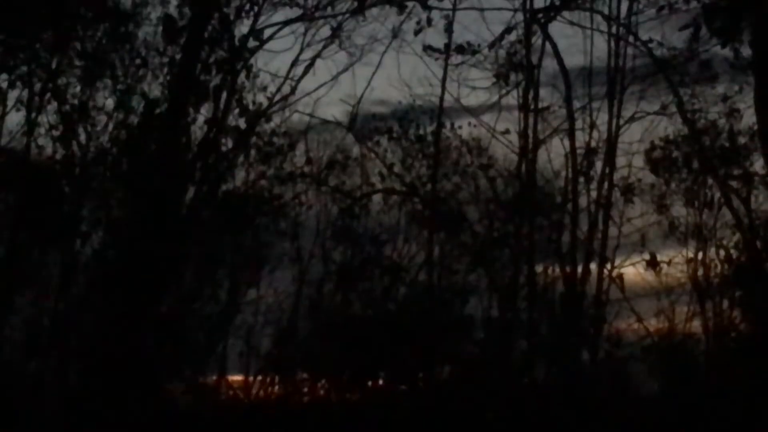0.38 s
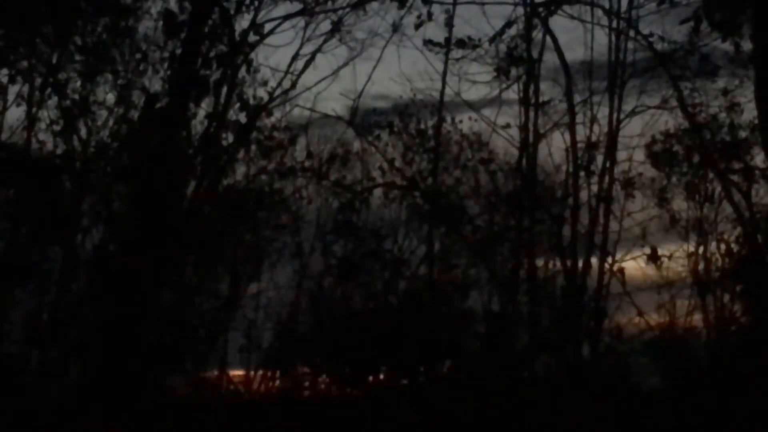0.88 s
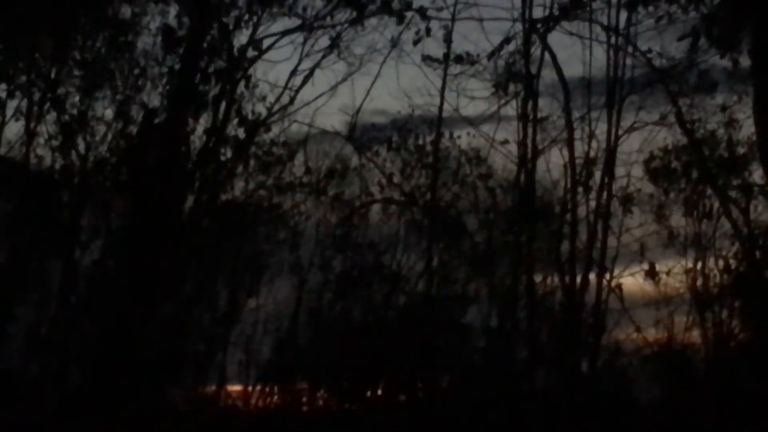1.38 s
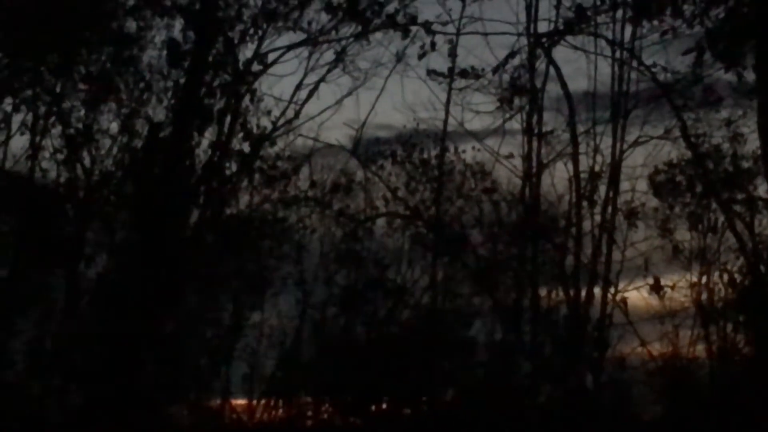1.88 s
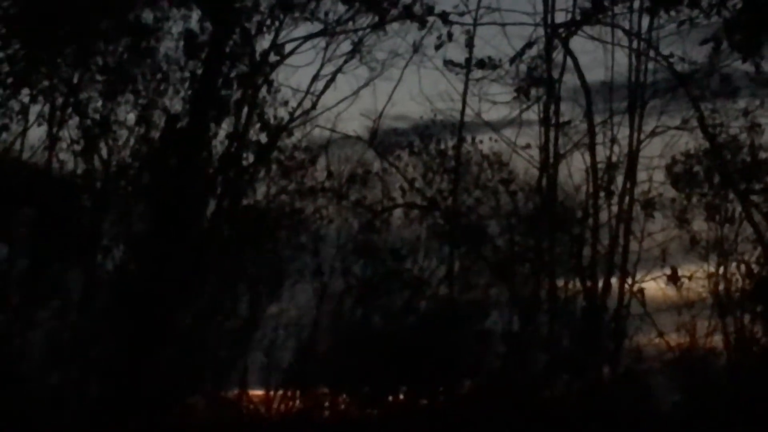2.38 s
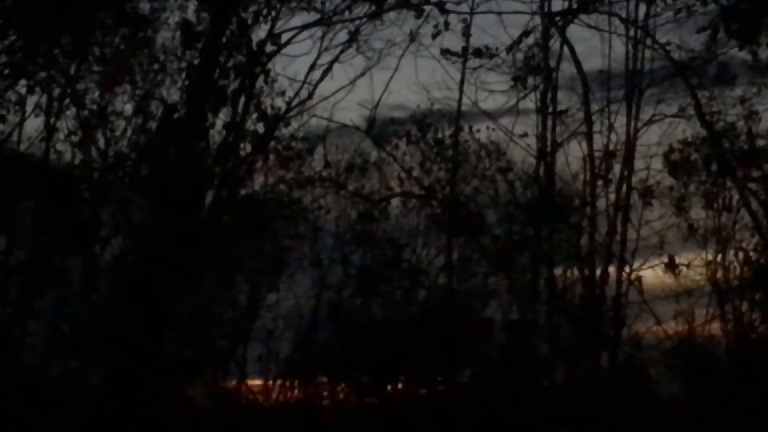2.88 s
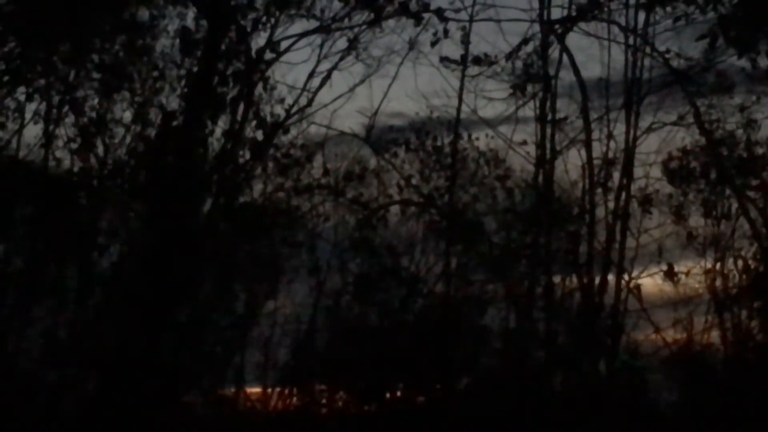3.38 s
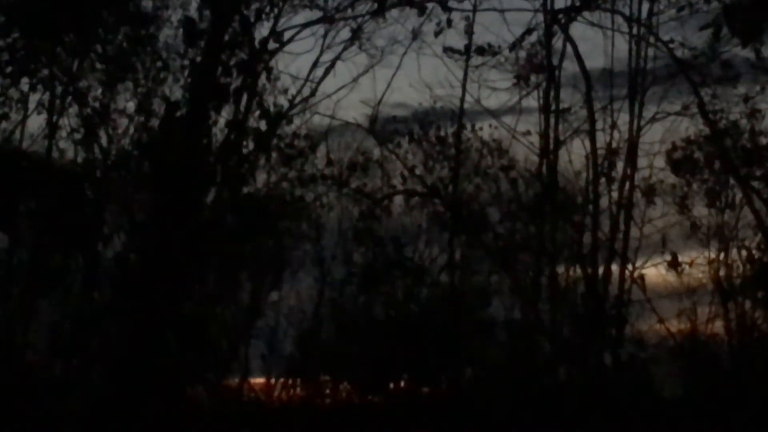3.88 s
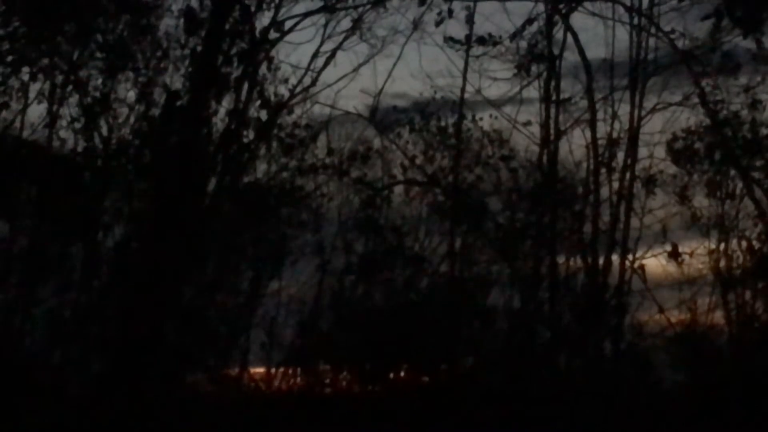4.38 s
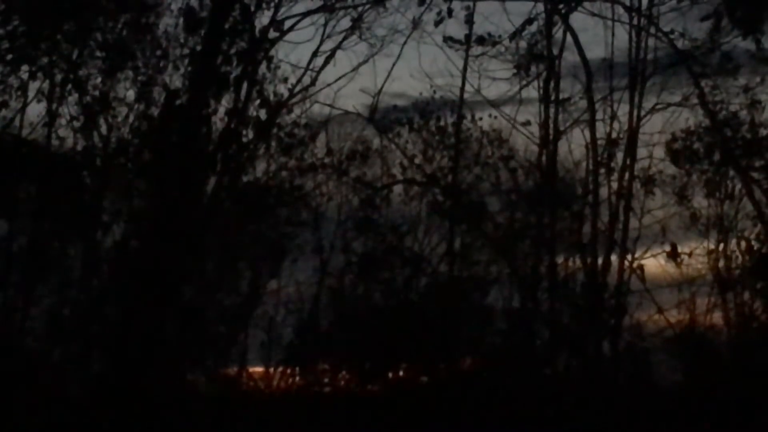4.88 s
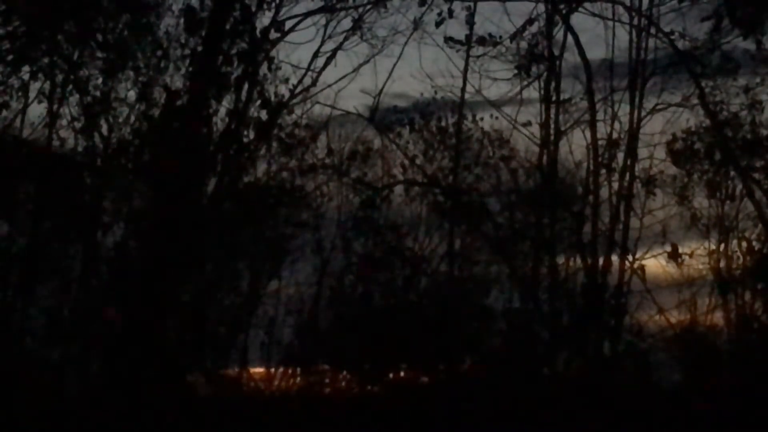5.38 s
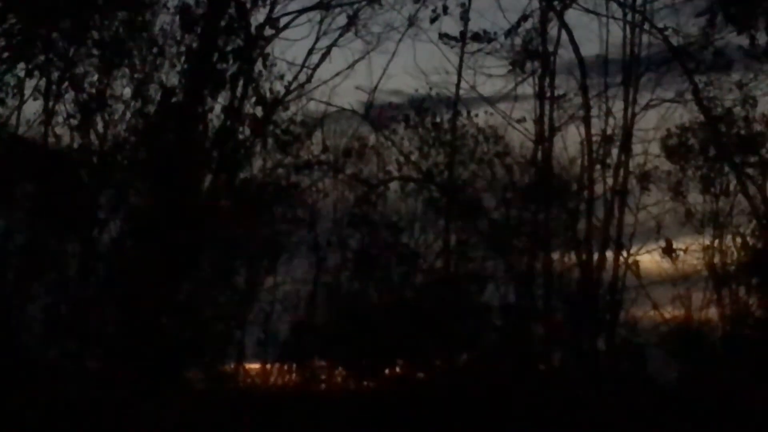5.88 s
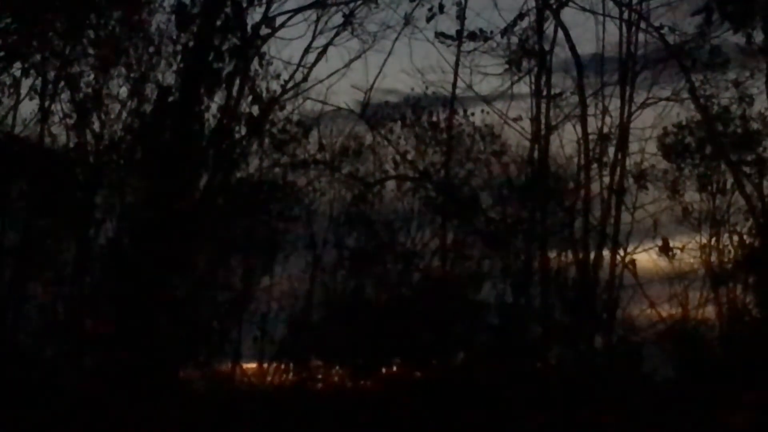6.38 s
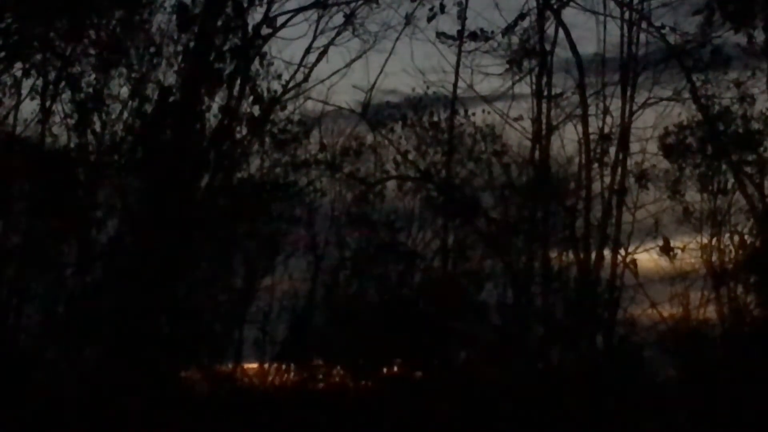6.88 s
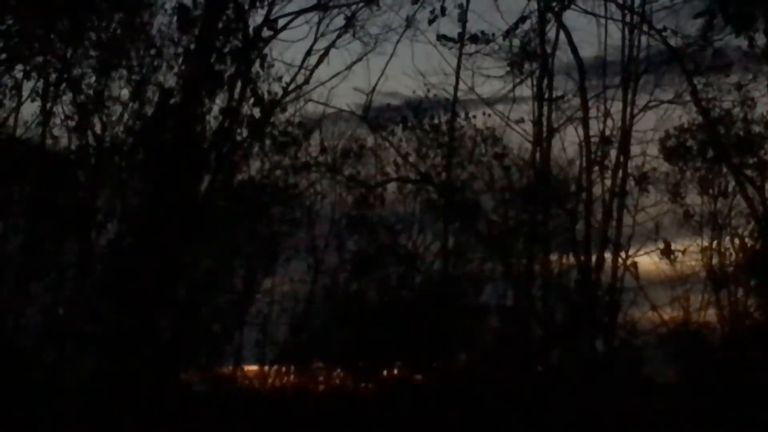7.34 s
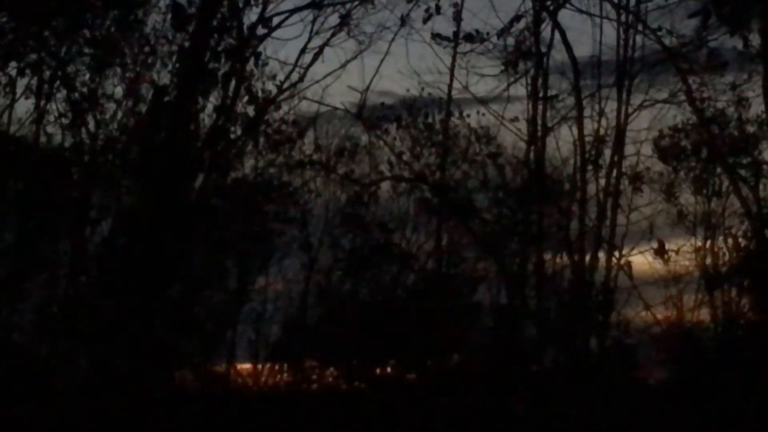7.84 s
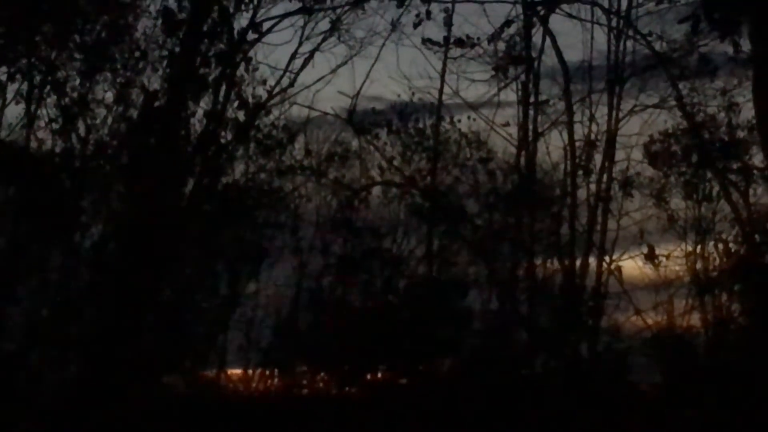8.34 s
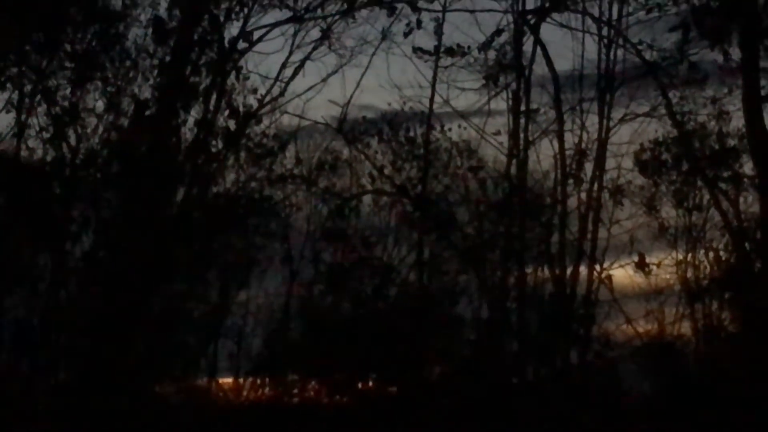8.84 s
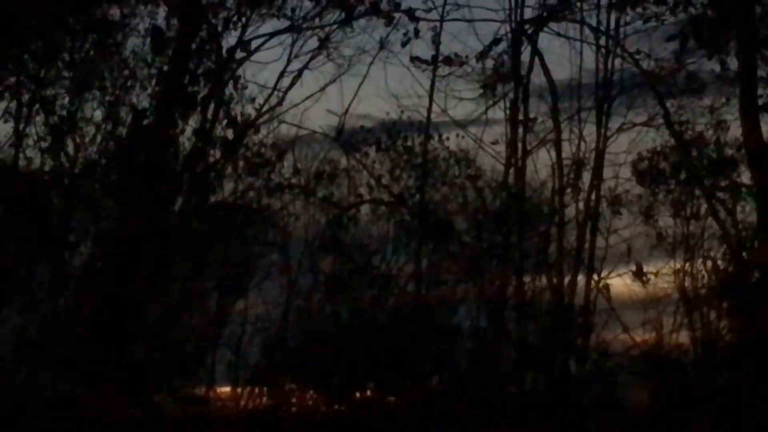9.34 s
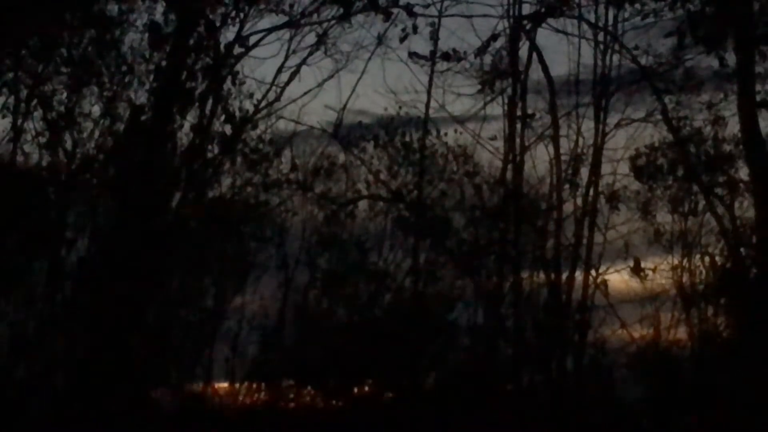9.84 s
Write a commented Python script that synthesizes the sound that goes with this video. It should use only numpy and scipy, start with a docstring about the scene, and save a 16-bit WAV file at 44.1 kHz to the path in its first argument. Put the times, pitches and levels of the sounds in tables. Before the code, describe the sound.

For the first 0.08 seconds there is low indoor rumble and the end of a hollow knock, then a hard cut to a dusk forest. A dense cricket chorus, strongest around 5.4 kHz with a thinner layer near 7 kHz, trills steadily to the end at about 10 seconds. Higher crickets and one nearer cricket chirp repeatedly, roughly twice a second. A small frog peeps about four times a second in broken runs; a higher one answers more often and louder after 6. Short rattling croaks come near 0.7, 1.5, 3.3, 4.0, 7.1, 7.8, 9.1 and 9.9. A far engine revs low throughout, surging around 2-2.6 and 5.7-6, then sinking and blipping near 9. Dry katydid rasps occur at 2.6 and 6.3; barely audible hoots at 2.3, 4.2 and 7.3. Faint slow trills come and go.

```python
"""First heard: an instant of indoor rumble and a hollow knock, then a forest at dusk.
Two cricket choirs, built of many drifting tones, stand in a far wash of insects and air made of shaped noise.
Nearer crickets chirp, frogs peep and croak and far hoots sound, all as gliding or pulsed tones in strokes.
A katydid rasps twice, as clicking noise through its wing resonances.
A distant engine is revved up and down: four orders of its firing rate over exhaust roar."""
import sys
import numpy as np
from scipy import signal
from scipy.fft import rfft, irfft, next_fast_len
from scipy.io import wavfile
from scipy.ndimage import uniform_filter1d, map_coordinates

SR = 44100
rng = np.random.default_rng(int(sys.argv[2]) if len(sys.argv) > 2 else 0)


def volts(x):
    """Linear amplitude factor 10**(x/20) for a level x in dB, scalar or array-like."""
    e = np.asarray(x, float) / 20
    return 10 ** e


def generate_wav(sig):
    """Save sig (samples, or channels by samples) to the path in sys.argv[1] as 16-bit PCM at SR."""
    pcm = np.round(np.clip(np.atleast_2d(sig).T, -1, 1) * 32767).astype(np.int16)
    wavfile.write(sys.argv[1], SR, pcm)


N = 440118
T = np.arange(N) / SR
RUN_SCATTER_S = .004  # how early or late the calls of a steady run fall


def unit(x):
    """Scales a sound to rms 1."""
    return x / np.sqrt(np.mean(x ** 2) + 1e-20)


def wobble(rate):
    """A smooth random curve, rate knots a second."""
    return map_coordinates(rng.standard_normal(int(N * rate / SR) + 4), [T * rate])


def filtered(x, response):
    """Multiplies the spectrum of x by a response of frequency."""
    m = next_fast_len(N + SR // 2)
    return irfft(rfft(x, m) * response(np.fft.rfftfreq(m, 1 / SR)), m)[:N]


def modes(table):
    """The summed response of resonances, given as (f/Hz, width/Hz, level/dB)."""
    return lambda f: sum(volts(db) * 1j * f * w / (c * c - f * f + 1j * f * w) for c, w, db in table)


def rush(spectrum, patchy_db):
    """Coloured noise of rms 1 with patches of random gain over time and frequency."""
    z = signal.stft(rng.standard_normal(N + 512), nperseg=512)[2]
    field = uniform_filter1d(rng.standard_normal(z.shape), 4, 0)
    field = uniform_filter1d(field, 10, 1)
    x = signal.istft(z * volts(patchy_db * unit(field)), nperseg=512)[1][:N]
    hz, db = np.transpose(spectrum)
    return unit(filtered(x, lambda f: volts(np.interp(np.log(f + 1), np.log(hz + 1), db))))


def strokes(turns, depth):
    """A gate that closes by depth (0-1) and reopens once a turn, as wings or a throat do."""
    return 1 - depth * np.sin(np.pi * turns) ** 2


def add(x, s, sound):
    """Mixes a sound into x at time s."""
    i = round(s * SR)
    x[i:i + len(sound)] += sound[:N - i]


def runs(table, scatter_s):
    """The call times of steady runs, each a little early or late."""
    times = np.concatenate([s + gap_s * np.arange(calls) for s, calls, gap_s in table])
    return np.clip(times + scatter_s * rng.standard_normal(len(times)), 0, N / SR)


def note(length_s, hz, rise_hz, stroke_hz, depth, overtone_db=-80):
    """One call: a gliding tone and its octave under a smooth swell, cut into strokes."""
    t = np.arange(round(length_s * SR)) / SR
    phase = 2 * np.pi * (hz * t + rise_hz * t * t / (2 * length_s)) + rng.uniform(0, 2 * np.pi)
    phase = phase + depth * np.cos(2 * np.pi * stroke_hz * t)  # the pitch slides within each stroke
    tone = np.sin(phase) + volts(overtone_db) * np.sin(2 * phase)
    swell = np.sin(np.pi * t / length_s) ** 0.18
    return swell * strokes(stroke_hz * t + .5, depth) * tone


def rough_tone(hz, width_hz, stroke_hz, depth):
    """Noise through one resonance twice gives a rough tone; strokes of drifting rate cut it."""
    ring = modes([(hz, width_hz, 0)])
    tone = filtered(rng.standard_normal(N), lambda f: ring(f) ** 2)
    turns = np.cumsum(stroke_hz * (1 + 0.0297 * wobble(0.97))) / SR
    return unit(tone * strokes(turns, depth))


def forest(x, t60, wet_db):
    """Trunks and leaves scatter a call into a short tail of decaying noise."""
    t = np.arange(SR // 2) / SR
    tail = rng.standard_normal(len(t)) * volts(-60 * t / t60)
    return x + volts(wet_db) * signal.fftconvolve(x, tail / np.linalg.norm(tail))[:N]


# Spectrum of the room rumble: [f/Hz, relative level/dB per Hz]
ROOM_SPECTRUM = [(35, -25), (60, -1), (338, -9.5), (502, -15.5), (12000, -47.5), (15900, -55)]


def indoors():
    """Room rumble as shaped noise, with the last of a hollow knock as a decaying 312 Hz tone."""
    knock = volts(-32.0 - 60 * T / 0.16) * np.sin(2 * np.pi * 312 * T)
    return volts(-43.5) * rush(ROOM_SPECTRUM, patchy_db=1.0) + knock


# Spectra of the low air, the far insect wash and the high sheen: [f/Hz, relative level/dB per Hz]
AIR_SPECTRUM = [(30, -32), (58, 1), (118, -3.5), (171, -15), (255, -10.5), (500, -22.5), (1200, -26),
                (1800, -30.5), (3400, -34.5), (4500, -63)]
WASH_SPECTRUM = [(3000, -46), (3900, -30.5), (4450, -15.5), (4870, -11), (5440, 0), (5880, -20.5),
                 (6390, -20), (6950, -4.5), (7610, -19), (8400, -24.5), (8560, -87)]
SHEEN_SPECTRUM = [(9600, -80), (9770, -7.5), (10900, 3.5), (11350, 1.5), (11900, -18), (14000, -5.5),
                  (15680, -11), (15760, -80)]


def bed():
    """Air, far insects and a high sheen, each as patchy noise in its own band."""
    air = volts(-55) * rush(AIR_SPECTRUM, patchy_db=1.63)
    wash = volts(-37.5) * rush(WASH_SPECTRUM, patchy_db=1.0)
    sheen = volts(-62) * rush(SHEEN_SPECTRUM, patchy_db=2.0)
    return air + wash + sheen


# Cricket choirs: [mean level/dB, centre f/Hz, pitch spread/Hz, mean stroke f/Hz, stroke depth 0-1]
CHOIR_VOICES = [(-35.5, 5430, 135, 67, 0.6), (-44, 6950, 150, 80, 0)]


def choir(centre_hz, spread_hz, stroke_hz, depth, count=26):
    """Many crickets, each on its own pitch and stroke rate, swelling independently."""
    step = 16  # the slow motion around the centre pitch needs only every 16th sample
    t = T[::step]
    total = 0
    for place in np.linspace(-1.8, 1.8, count):
        drift = wobble(30)[::step]  # pitch is never quite steady
        phase = 2 * np.pi * np.cumsum(spread_hz * (place + .5 * drift)) * step / SR
        turns = stroke_hz * (1 + .06 * rng.standard_normal()) * t + rng.random()
        level = volts(-4 * place ** 2 + 1.73 * wobble(8)[::step])  # weaker away from the centre
        total = total + level * strokes(turns, depth) * np.exp(1j * phase)
    slow = np.interp(T, t, total.real) + 1j * np.interp(T, t, total.imag)
    return unit((slow * np.exp(2j * np.pi * centre_hz * T)).real)


def choirs():
    """Sums the choirs, each wavering slightly in level."""
    return sum(volts(db + 0.7 * wobble(2.926)) * choir(*voice) for db, *voice in CHOIR_VOICES)


# Thin steady crickets: [f/Hz, resonance width/Hz, mean level/dB]
THIN_LINES = [(6086, 40, -55), (7960, 70, -56), (4735, 30, -56), (4594, 40, -57)]


def thin_crickets():
    """Steady far crickets: narrow rough tones, shallow strokes, wavering level."""
    return sum(volts(db + 4.2 * wobble(3)) * rough_tone(hz, w, 24, 0.16) for hz, w, db in THIN_LINES)


# Engine revs: [t/s, mean firing f/Hz, level/dB before a 1.27 dB cut]
ENGINE_REVS = [(.1, 44.76, -45.5), (.75, 40.76, -55), (.95, 43.86, -43.5), (1.4, 33.8, -52),
               (1.55, 33.96, -43), (1.75, 44.6, -45.5), (2, 66.1, -37.5), (2.3, 79.7, -51),
               (2.6, 66.86, -42.5), (3.1, 43.22, -47), (4.1, 37.62, -51.5), (4.4, 43.9, -44), (5, 30, -49),
               (5.65, 57.97, -41), (6, 63, -41), (6.4, 56.3, -48), (6.9, 42.8, -50.5), (8.45, 33.74, -57.5),
               (8.65, 33.9, -45), (8.9, 39.9, -51), (9.15, 33.06, -47), (9.32, 41.1, -44.5), (10, 32, -67)]
# What reaches the microphone of each engine order: [f/Hz, relative level/dB]
EXHAUST_PATH = [(35, -19.5), (62, 5.5), (88, -1), (115, -2), (135, -13.5), (155, -22), (200, -26.5),
                (252, -7.5), (310, -14)]


def engine():
    """Four orders of the firing rate, each wavering on its way through the trees, over exhaust roar."""
    times, rates, levels = np.transpose(ENGINE_REVS)
    hz = np.interp(T, times, rates)
    level_db = np.interp(T, times, levels)
    phase = 2 * np.pi * np.cumsum(hz * (1 + 0.0118 * wobble(12))) / SR
    path_hz, path_db = np.transpose(EXHAUST_PATH)
    tones, power = 0, 0
    for order in range(1, 5):
        gain = volts(np.interp(order * hz, path_hz, path_db) + 2.9 * wobble(4))
        tones = tones + gain * np.sin(order * phase + rng.uniform(0, 2 * np.pi))
        power = power + gain ** 2 / 2
    tones = tones / np.sqrt(power)  # the rev levels alone set the loudness
    roar = rough_tone(251, 47, 40, .2) + 0.51 * rough_tone(345.0, 50, 30, .2)
    return volts(level_db - 1.27) * (tones + volts(-15.5) * roar)


def frog_murmur():
    """The far frog crowd blurred together: a wide rough tone."""
    return volts(-62.5) * rough_tone(2262, 235, 9, 0.2)


def frog_crowd():
    """Single calls of the far crowd: 420 short notes at random times, pitches and levels."""
    x = np.zeros(N)
    for when, (pitch, size) in zip(rng.random(420), rng.standard_normal((420, 2))):
        call = note(0.033, 2250 + 95 * pitch, 63, 64, 0.43, overtone_db=-7)
        add(x, when * N / SR, volts(-63.0 + 3.0 * size) * call)
    return x


# High crickets, each at its own pace:
# [mean f/Hz, chirp length/s, stroke f/Hz, mean level/dB, first chirp t/s, mean time between chirps/s]
HIGH_CRICKETS = [(8200, .13, 28.3, -49, .05, .562), (8130, .2, 24, -45.5, .38, .415),
                 (7960, .25, 25.3, -46, .45, .58), (7730, .13, 30, -53, .68, .705)]


def high_crickets():
    """High chirps in deep wing strokes, repeated at each cricket's loose pace."""
    x = np.zeros(N)
    for hz, length_s, stroke_hz, db, first_s, gap_s in HIGH_CRICKETS:
        calls = int((N / SR - first_s) / gap_s) + 1
        times = runs([(first_s, calls, gap_s)], scatter_s=.04)
        for s, (size, pitch) in zip(times, rng.standard_normal((len(times), 2))):
            add(x, s, volts(db + 2.5 * size) * note(length_s, hz + 12 * pitch, 0, stroke_hz, .7))
    return x


# Chirp runs of the near cricket: [first call t/s, calls, mean time between calls/s]
NEAR_RUNS = [(.09, 6, .531), (3.31, 3, .51), (4.9, 4, .53), (7.196, 6, .546)]


def near_cricket():
    """Each chirp is two close tones beating under the same wing strokes."""
    x = np.zeros(N)
    for s in runs(NEAR_RUNS, RUN_SCATTER_S):
        db = -48 + 1.3 * rng.standard_normal()
        add(x, s, volts(db) * note(.11, 5845, 30, 65, .5))
        add(x, s, volts(db) * note(.11, 5985, 12, 65, .5))
    return x


# Peep runs of the regular frog: [first call t/s, calls, mean time between calls/s]
PEEP_RUNS = [(.13, 6, .2204), (1.467, 6, .2296), (2.874, 7, .2317), (4.512, 5, .2355), (5.717, 13, .2293),
             (8.733, 6, .232)]


def regular_frog():
    """Short peeps whose octave is stronger than the base tone."""
    x = np.zeros(N)
    for s in runs(PEEP_RUNS, RUN_SCATTER_S):
        db = -50.0 + 2.3 * rng.standard_normal()
        add(x, s, volts(db) * note(0.029, 2287, 25, 37, 0.53, overtone_db=5))
    return x


def croak(length_s=0.061, pulse_hz=143):
    """High orders of the throat pulses, weighted by two resonances that slide up across them."""
    t = np.arange(round(length_s * SR)) / SR
    order = np.arange(12, 35)[:, None]
    hz = pulse_hz * order
    centre_hz = 2050 + 240 * t / length_s
    lower = np.exp(-((hz - centre_hz) / 150) ** 2)
    upper = volts(10) * np.exp(-((hz - 2 * centre_hz - 120) / 280) ** 2)
    # pulse spacing wavers
    uneven = 1 + 0.019 * np.interp(t, np.linspace(0, length_s, 10), rng.standard_normal(10))
    turns = np.cumsum(pulse_hz * uneven) / SR
    pulses = ((lower + upper) * np.sin(2 * np.pi * order * turns)).sum(axis=0)
    swell = np.sin(np.pi * t / length_s) ** 0.32
    return swell * volts(-2.5 * t / length_s) * pulses


# Croaks: [t/s, gain/dB]
CROAK_CALLS = [(0.6898, -50), (1.4551, -51), (3.3345, -49), (4.0497, -48.5), (6.0594, -63), (7.0663, -48.5),
               (7.7609, -48), (8.1823, -64), (9.1157, -48.5), (9.8653, -48.5)]


def croaking_frog():
    """Places each pulsed croak at its time and gain."""
    x = np.zeros(N)
    for s, db in CROAK_CALLS:
        add(x, s, volts(db) * croak())
    return x


# Calls of a higher frog, slowly coming nearer: [t/s]
ANSWER_TIMES = [1.429, 1.658, 2.446, 3.517, 5.475, 6.279, 6.576, 7.078, 7.285, 7.495, 7.733, 8.292, 8.821,
                9.335, 9.534, 9.784]


def answering_frog():
    """Short rising peeps with a weaker octave, on average 0.53 dB louder each second."""
    x = np.zeros(N)
    for s in ANSWER_TIMES:
        db = -50.5 + 0.53 * s + 2.32 * rng.standard_normal()
        add(x, s, volts(db) * note(.03, 2350, 59, 60.5, 0.64, overtone_db=-6))
    return x


# Far hoots: [t/s, length/s, f/Hz]
HOOT_CALLS = [(2.283, 0.68, 1283), (4.177, .2, 1003), (7.301, 0.27, 939)]


def hoots():
    """Soft, nearly pure notes from far off, with a shallow pulse."""
    x = np.zeros(N)
    for s, length_s, hz in HOOT_CALLS:
        add(x, s, volts(-70.0) * note(length_s, hz, 0, 8.2, .3))
    return x


# Phrases of the slow triller: [t/s, length/s]
TRILL_PHRASES = [(2.3, 1.36), (4.55, 1.21), (6.701, 1.01), (8.75, 1.09)]


def slow_triller():
    """A far cricket's rough tone in deep strokes, faded in and out with each phrase."""
    on = sum(np.clip(np.minimum(T - s, s + length_s - T) / 0.16, 0, 1) for s, length_s in TRILL_PHRASES)
    return volts(-66.5) * on * rough_tone(3680, 260, 31.3, 0.84)


# Katydid calls: [t/s, level/dB of the strong strokes before a 6.5 dB cut, strong strokes]
RASP_CALLS = [(2.6364, -41, 3), (6.3445, -39, 2)]


def katydid():
    """Each stroke is a quick-starting burst of tooth clicks, rung by the wing resonances."""
    stroke_count, gap_s, weak_db = 4, .0812, -14  # the closing strokes are weak
    gate, t = np.zeros(N), np.arange(SR // 5) / SR
    for s, db, strong in RASP_CALLS:
        for k in range(stroke_count):
            stroke_db = db + weak_db * (k >= strong)
            decay = volts(stroke_db - 6.5 - 60 * t / 0.43)
            clicks = strokes(700 * t, .6)  # 700 teeth a second
            add(gate, s + k * gap_s, decay * (1 - np.exp(-t / 0.014)) * clicks)
    wing = modes([(12200, 500, -4), (13500, 1700, 3), (15200, 1500, -7)])
    return gate * unit(filtered(rng.standard_normal(N), lambda f: wing(f) ** 2))


def scene():
    """The room gives way to the forest within 1.9 ms."""
    chirps = high_crickets() + near_cricket()
    chirps = chirps * volts(3.4 * wobble(40))  # a quick random flutter in level roughens the chirps
    frogs = frog_crowd() + regular_frog() + croaking_frog() + answering_frog()
    outside = bed() + choirs() + thin_crickets() + engine() + frog_murmur()
    outside += forest(chirps, t60=.35, wet_db=-8) + forest(frogs, t60=.35, wet_db=-2)
    outside += hoots() + slow_triller() + katydid()
    fade = np.clip((T - 0.0804) / 0.0019, 0, 1)
    return (fade * outside + (1 - fade) * indoors())[None]


def top_cut(x):
    """Nothing passes above the cut-off."""
    return signal.sosfilt(signal.butter(12, 16040, fs=SR, output="sos"), x)


def record(dry):
    """Turns the finished mix into the sound that is written out."""
    return top_cut(dry)


dry = scene()
out = record(dry)
generate_wav(out)
```